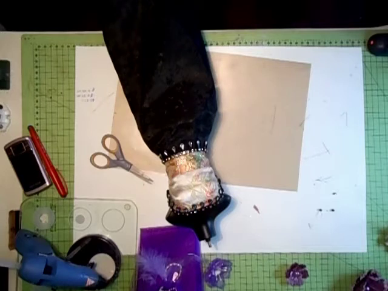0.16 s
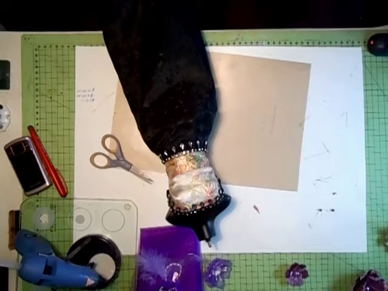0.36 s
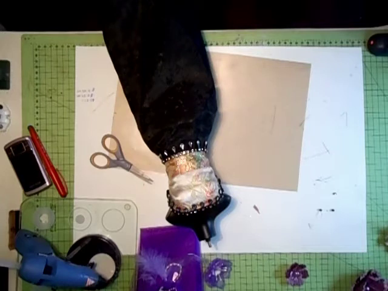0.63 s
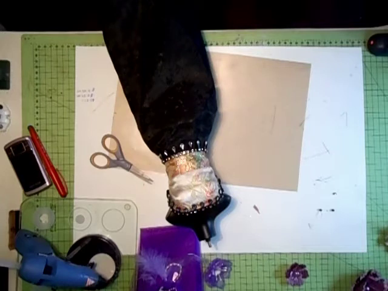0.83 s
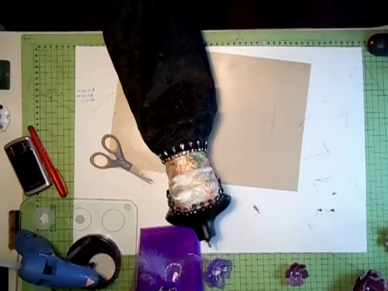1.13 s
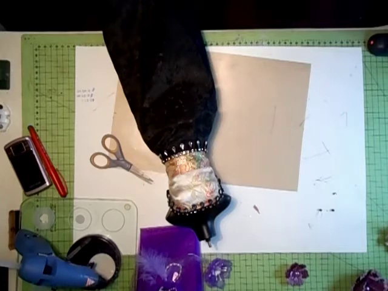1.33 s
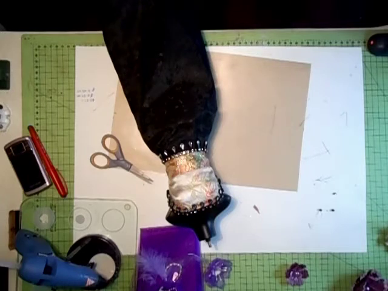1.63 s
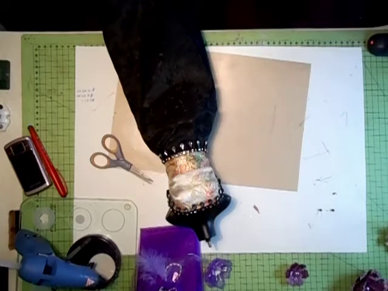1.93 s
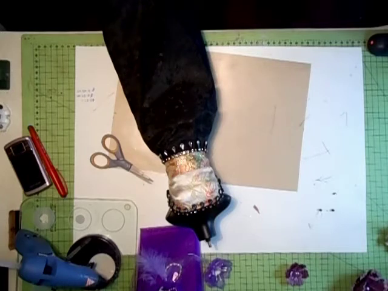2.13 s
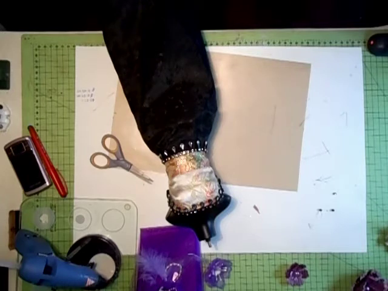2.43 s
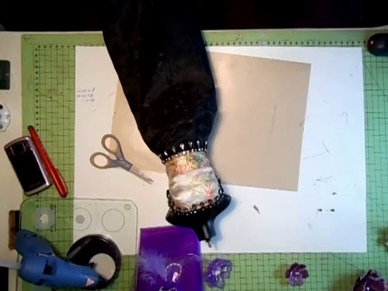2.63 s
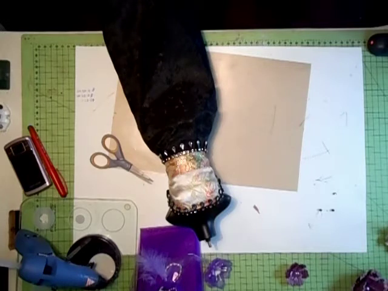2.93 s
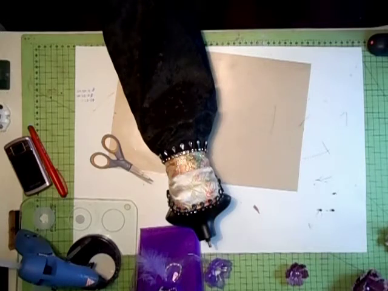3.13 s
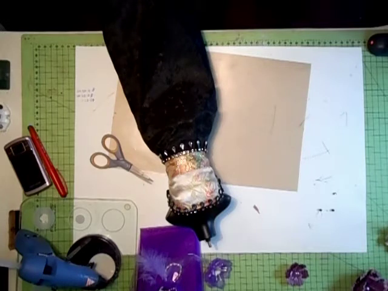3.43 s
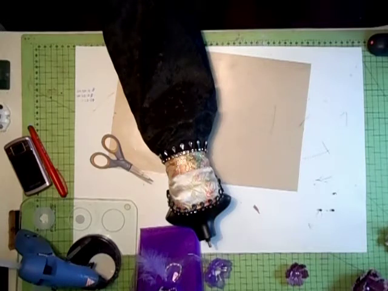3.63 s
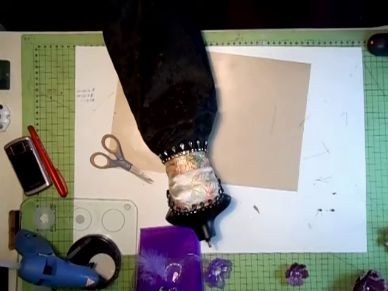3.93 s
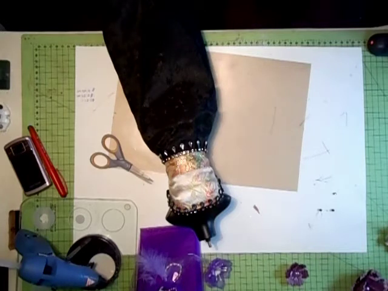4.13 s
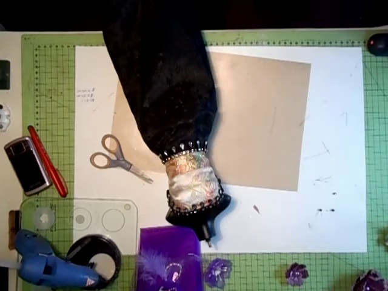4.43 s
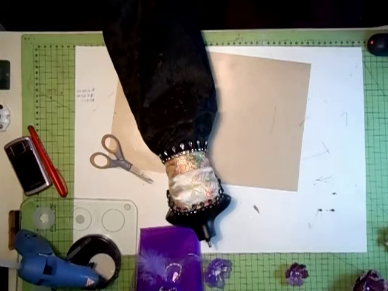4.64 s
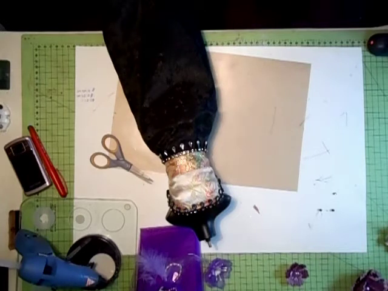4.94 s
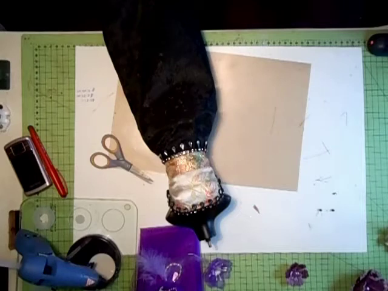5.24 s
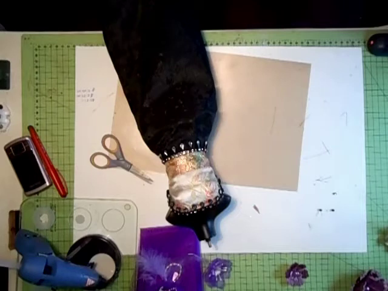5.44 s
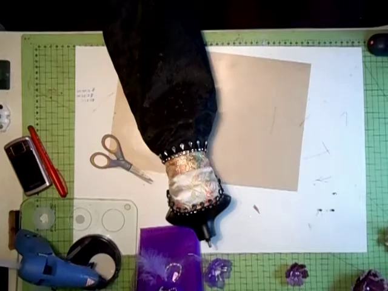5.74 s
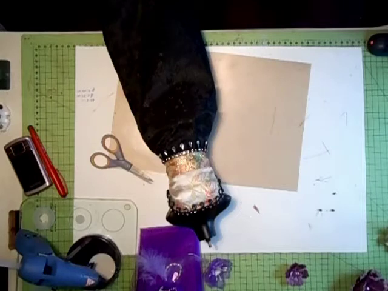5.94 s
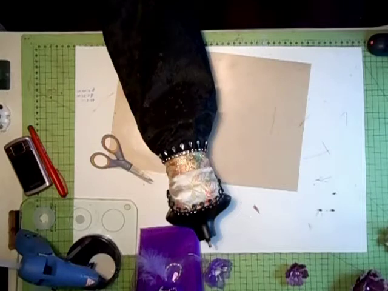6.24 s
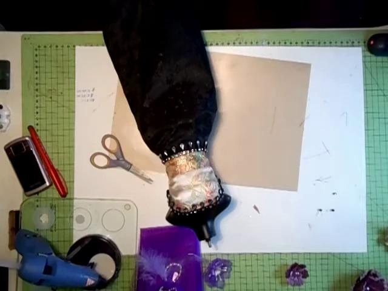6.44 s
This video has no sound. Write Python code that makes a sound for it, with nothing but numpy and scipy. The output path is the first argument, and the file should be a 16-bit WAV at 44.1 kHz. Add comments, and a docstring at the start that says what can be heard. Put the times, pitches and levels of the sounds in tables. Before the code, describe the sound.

A rattle of small hard pieces is already under way, close by, as fingers rummage in a box of buttons and jewellery. Short irregular stirs bring bright ticks, duller clacks and soft box knocks, with faint thin metallic rings. Activity nearly stops just after three seconds, then resumes with knocks and builds to lively rattling at the end. Small furnished room, close stereo microphone, faint steady hiss.

```python
"""Small hard pieces rattle at once; bursts of rattle come and go throughout, with separate ticks, clacks
and soft knocks among them, as fingers search through a box of buttons and jewellery beside a craft table.
Clicks at listed times and random contacts under each stir set ringing tones going: pieces, box and table.
Thin metal chimes and short pitched clinks join in, and the air in the box booms.
Noise tails make the small furnished room; two close microphone ports hear it slightly from the left, over a faint hiss."""
import sys
import numpy as np
from scipy import signal
from scipy.fft import rfft, irfft, next_fast_len
from scipy.io import wavfile

SR = 44100
rng = np.random.default_rng(int(sys.argv[2]) if len(sys.argv) > 2 else 0)


def materialize(psi):
    """Save the field psi as 16-bit PCM at rate SR to the path in sys.argv[1].

    A 1-D psi becomes a single channel; in a 2-D psi each row is a channel.
    """
    bounded = np.clip(np.atleast_2d(psi).T, -1, 1)
    quanta = np.round(bounded * 32767).astype(np.int16)
    wavfile.write(sys.argv[1], SR, quanta)


N = 289726   # length in samples
HOLLOW_HZ, HOLLOW_T60_S = 171, 0.11   # the air in the box


def from_db(db):
    """Gain of a dB value."""
    return 10 ** (np.asarray(db) / 20)


def rms_one(x):
    """Scaled to rms 1, over all rows together."""
    return x / np.sqrt(np.mean(x ** 2) + 1e-20)


def at_hz(points, hz, axis=1):
    """A table column read on a log-frequency axis."""
    points = np.array(points)
    return np.interp(np.log(hz), np.log(points[:, 0]), points[:, axis])


def band(x, low_hz, high_hz):
    """A small body radiates little below its modes, a soft contact excites little above."""
    return signal.sosfilt(signal.butter(2, [low_hz, high_hz], "band", fs=SR, output="sos"), x)


def train(times, db):
    """Clicks of the given dB at the given times."""
    out = np.zeros(N)
    places = np.minimum(np.round(np.asarray(times) * SR).astype(int), N - 1)
    np.add.at(out, places, from_db(db))
    return out


def ring(clicks, hz, t60):
    """A two-pole resonator: a unit click sets a tone of about height 1 ringing."""
    r = from_db(-60 / (t60 * SR))
    w = 2 * np.pi * hz / SR
    tone = signal.lfilter([.5, 0, -.5], [1, -2 * r * np.cos(w), r * r], clicks + 1e-18)
    return tone / np.sin(w / 2 + np.pi / 4)


def modes(clicks, table):
    """A body rings in its own modes, struck at another spot each time."""
    spread_db = 2.5
    out = 0
    for k, (hz, width_hz, db) in enumerate(table):
        struck = clicks * from_db(spread_db * rng.standard_normal(N)) * (-1) ** k
        t60_s = np.log(1000) / np.pi / width_hz
        out = out + from_db(db) * ring(struck, hz, t60_s)
    return out


def pieces(clicks, spectrum, cycles, count, lag_cycles=.2):
    """Pieces of many sizes: each contact jolts them together, the small ones first, in a new mix every time."""
    mix_spread_db = 3.5   # how much the mix changes from contact to contact
    out = 0
    for hz in np.geomspace(spectrum[0][0], spectrum[-1][0], count):
        jolts = clicks * from_db(mix_spread_db * rng.standard_normal(N))
        struck = np.roll(jolts, int(lag_cycles * SR / hz))
        out = out + from_db(at_hz(spectrum, hz)) * ring(struck, hz, cycles / hz)
    return out / np.sqrt(count)


def stereo_bands(size, likeness):
    """Half-octave bands of stereo noise with their centres; left and right share a set part of each."""
    edges = 22 * 2 ** np.arange(0, 9.6, .5)
    white = rng.standard_normal((2, 2, size))
    for k, (low, high) in enumerate(zip(edges, edges[1:])):
        mid, side = band(white[k % 2], low, high)   # neighbouring bands draw on different noise
        centre = np.sqrt(low * high)
        alike = np.clip(at_hz(likeness, centre), -1, 1)
        yield centre, np.sqrt(1 + alike) * mid + np.sqrt(1 - alike) * side * [[1], [-1]]


def stirring():
    """Each stir sets in quickly, swells or sags evenly in dB and stops; rows drive ticks, clacks and knocks."""
    # stirs of the hand in the heap, levels ahead of the rattle drive:
    # start_s, length_s, rattle_db, swell_db over the stir, brightness_db of ticks, box_weight_db of knocks
    stirs = [(-0.02, 0.21, -39.5, -13, -2.5, -1.5), (0.226, 0.21, -48, -1.5, -1.5, -5.5),
             (0.461, 0.056, -51, 4.5, -2, -1.5), (0.632, 0.059, -57, 7.5, -5, -28),
             (0.757, 0.053, -52, 0, -4, 4), (0.891, 0.096, -52, -3, -14, 3),
             (1.024, 0.21, -55, -16, -40, -2), (1.328, 0.084, -54, 5.5, -4, 2.5),
             (1.443, 0.14, -46, -15, -7, -3), (1.942, 0.12, -48.5, -1, -18, 0),
             (2.107, 0.029, -46.5, -7.5, -2.5, -2.5), (2.209, 0.1, -65, -5, -10, 6),
             (2.508, 0.057, -75, 2.5, 0, 11), (2.564, 0.04, -47.5, -15.5, -3, -5),
             (2.651, 0.015, -52, -6.5, -23, -13), (2.738, 0.065, -68.5, 12.5, -1, -3),
             (2.865, 0.13, -56, -2, 1.5, -0.5), (2.974, 0.036, -41.5, -1.5, -7.5, -10.5),
             (3.916, 0.09, -65.5, -4.5, -9, -6), (4.068, 0.12, -67.5, -2, -27, 17),
             (4.269, 0.028, -52, -1, -21, 8), (4.434, 0.092, -63.5, 14, -7, -9),
             (4.564, 0.11, -56, -12, -17, 3), (4.662, 0.094, -54, 0, -9.5, -0.5),
             (4.802, 0.16, -48.5, -3.5, -1.5, 0.5), (4.941, 0.064, -50, -1, -5, -8),
             (5.132, 0.043, -58.5, -1.5, -2, 4.5), (5.174, 0.16, -54, 8.5, -4, -2),
             (5.466, 0.049, -56, 0.5, -16, 1), (5.623, 0.022, -60, -8, -9, -6),
             (5.706, 0.029, -65.5, 9.5, -6, -3), (5.742, 0.12, -50.5, 5.5, -8, -5.5),
             (5.91, 0.19, -44.5, -17, -11, -3.5), (6.104, 0.098, -45.5, -14, -6, -5),
             (6.243, 0.088, -37.5, -9.5, -15, -7), (6.346, 0.07, -47, 1, -6, 0),
             (6.432, 0.12, -58.5, 4.5, -4, -8)]
    attack_s, release_s = 0.0093, 0.028
    t, out = np.arange(N) / SR, np.zeros((3, N))
    for s, length, db, swell_db, bright_db, weight_db in stirs:
        span = slice(max(int(s * SR), 0), int((s + length + release_s) * SR))
        age = t[span] - s
        gate = np.clip(np.minimum(age / attack_s, 1 - (age - length) / release_s), 0, 1)
        row_db = np.array([[bright_db], [0], [weight_db]])
        out[:, span] += gate * from_db(db + swell_db * age / length + row_db)
    return out


def heap():
    """Single collisions and the stirred rattle excite the same bodies: small pieces, box and the air in it."""
    # single collisions, levels ahead of the blow drive: start_s, tick_db, clack_db, box_knock_db
    hits = [(0.004, -36, -25, -33), (0.0963, -26.5, -31, -34), (0.2137, -20.5, -20, -25),
            (0.2307, -38, -38, -39.5), (0.248, -37, -38, -46), (0.2634, -27, -55, -56),
            (0.307, -37, -37, -33), (0.2924, -26, -30, -48), (0.3841, -25.5, -30, -39),
            (0.4862, -44, -47, -34), (0.6298, -31.5, -42, -45), (0.6481, -16.5, -29.5, -28),
            (0.6686, -22.5, -46, -46), (0.7665, -48, -52, -48), (0.782, -33, -29, -41),
            (0.8132, -30, -29, -31), (0.851, -25.5, -25.5, -30.5), (0.866, -48, -29.5, -45),
            (0.931, -37, -36, -51), (0.9483, -35.5, -29.5, -44), (0.978, -27, -32.5, -41),
            (0.9965, -59, -42, -49), (1.3441, -54, -35, -51), (1.358, -42.5, -27, -35),
            (1.414, -29.5, -19.5, -26.5), (1.585, -53, -47, -28), (1.6798, -48.5, -55, -64),
            (1.8298, -44, -55, -50.5), (1.9566, -55, -35.5, -48), (1.9799, -33.5, -27.5, -40),
            (2.0106, -25, -37, -48), (2.016, -47, -30, -44), (2.0404, -30, -33, -43),
            (2.1207, -30.5, -34, -50), (2.3935, -52, -44, -46), (2.3977, -46, -40, -40),
            (2.4101, -43, -37.5, -41), (2.426, -38, -51, -45), (2.4343, -40, -40, -55),
            (2.4707, -32, -30, -34), (2.566, -41, -39.5, -58), (2.67, -54, -45, -43),
            (2.7355, -59, -45, -53), (2.7633, -53, -41, -58), (2.7921, -35, -35.5, -63),
            (2.8355, -36, -35, -45), (2.8788, -64, -32, -31), (2.8917, -59, -26.5, -38.5),
            (2.9337, -34, -45, -42), (2.9371, -28, -27.5, -51), (2.9916, -49, -36, -58),
            (3.5197, -83, -44.5, -37.5), (3.594, -46, -30, -27.5), (3.608, -67, -37, -40),
            (3.6703, -57, -36, -36), (4.0284, -28.5, -25.5, -26), (4.1724, -66, -46, -40),
            (4.2285, -66, -38, -29.5), (4.2685, -25.5, -20.5, -17.5), (4.297, -59, -27, -30.5),
            (4.3902, -40.5, -37, -43), (4.5002, -38, -32.5, -36), (4.5368, -26, -21, -22),
            (4.542, -23.5, -19.5, -50), (4.684, -47, -53, -51), (4.7849, -30.5, -40.5, -40),
            (4.8064, -33.5, -28, -37), (4.8663, -34, -36, -56), (4.9099, -30.5, -50, -42),
            (4.9394, -35, -38, -39), (5.1207, -40.5, -42, -41), (5.1823, -35, -65, -38),
            (5.2387, -38, -43, -34), (5.3125, -40, -36, -33), (5.3399, -51, -30.5, -24),
            (5.3577, -18.5, -24.5, -28.5), (5.4708, -27, -42, -57), (5.5081, -35, -52, -40),
            (5.7651, -65, -31, -27.5), (5.825, -32, -31, -47), (5.857, -25.5, -31, -49),
            (5.883, -30, -33, -37), (5.9317, -47, -52, -50), (5.9713, -39, -39, -60),
            (6.072, -32, -33.5, -63), (6.0917, -20, -33, -30), (6.126, -27, -31, -49),
            (6.224, -39, -27.5, -33), (6.239, -23.5, -29.5, -26.5), (6.2486, -33, -22, -35),
            (6.3667, -34, -31, -43), (6.4535, -30, -53.5, -60), (6.5333, -41.5, -44, -43)]
    # how strongly blows and rattle drive the bodies; rows are ticks, clacks, knocks: drive_db
    blow_db = [
        [10],
        [9],
        [-1.5],
    ]
    rattle_db = [
        [1],
        [-5.5],
        [-17.5],
    ]
    # density of random contacts; rows are ticks, clacks, knocks: contacts_per_s
    rattle_per_s = [
        [140],
        [220],
        [320],
    ]
    # colour of the bright ticks between pieces: pitch_hz, level_db
    tick_colour = [(3000, -16), (5200, -1.5), (6500, -3.5), (8500, -9), (11000, -10), (14200, -30.5)]
    # colour of the duller clacks between pieces: pitch_hz, level_db
    clack_colour = [(1100, -1.5), (1500, -6), (2000, -3), (2600, -3), (3300, -7.5), (4300, -2.5)]
    # resonances of the box: pitch_hz, width_hz, level_db
    box_modes = [(287.5, 55, -24.5), (369, 101, -16.5), (480, 132, -10), (660.5, 116, -3.5), (758, 121, -1),
                 (894, 147, -4), (1206, 196, -3), (1570, 730, -6.5)]
    hollow_db, crack_db = -37.5, -12

    sizes = from_db(3.4 * np.minimum(rng.exponential(1, (3, N)), 4))
    contacts = rng.random((3, N)) < np.divide(rattle_per_s, SR)
    rattle = rms_one(sizes * contacts) * rng.choice([-1, 1], N)
    at, *levels_db = np.transpose(hits)
    blows = from_db(blow_db) * [train(at, db) for db in levels_db]
    ticks, clacks, knocks = blows + rattle * from_db(rattle_db) * stirring()

    # the air in the box is shaken mostly by the stirring, so the blows count less
    shaking = (clacks - 0.46 * blows[1]) * rng.choice([-1, 1], N)
    hollow = from_db(hollow_db) * ring(shaking, HOLLOW_HZ, HOLLOW_T60_S)
    bright = band(pieces(ticks, tick_colour, cycles=7.6, count=20), 4200, 12000)
    dull = band(pieces(clacks, clack_colour, cycles=4.9, count=17), 1305, 8100)
    dull = band(dull, 350, 6500)
    box = band(modes(knocks, box_modes), 230, 5600)
    # the bare contact of a collision, before anything rings
    crack = from_db(crack_db) * band(blows[0], 2530, 15600)
    return bright + dull + box + band(hollow, 69, 188) + crack


def hiss():
    """Steady room air and microphone noise, built from noise bands."""
    # relative noise spectrum: centre_hz, density_db per Hz
    spectrum = [(15, -32), (25, -7), (67, -4), (168, -1), (372, 1), (916, -0.5), (1050, -6), (1260, -0.5),
                (6500, -18), (14000, -27)]
    # how alike left and right are: centre_hz, likeness (0-1)
    likeness = [(30, 0.82), (100, 0.29), (370, 0.34), (2320, 0.19), (14400, 0.03)]
    level_db = -60.5
    noise = sum(from_db(at_hz(spectrum, hz)) * b for hz, b in stereo_bands(N, likeness))
    return from_db(level_db) * rms_one(noise)


def thumps():
    """Heavier things set down softly ring the modes of the table top."""
    # things set down on the table: start_s, level_db of the blow
    set_down = [(0.004, -53), (1.413, -53.5), (1.586, -54), (3.595, -49), (4.029, -48), (4.228, -51),
                (4.269, -41), (6.239, -69)]
    # resonances of the table top: pitch_hz, width_hz, level_db
    table_modes = [(60, 110, -28), (117, 5.7, -16.5), (292, 35, 4.5), (411, 28.4, 0.5)]
    return band(modes(train(*np.transpose(set_down)), table_modes), 34, 590)


def nudges():
    """A soft push on the box sets the air in it ringing, so it booms."""
    # pushes on the box: start_s, level_db of the push
    pushes = [(.01, -45.5), (0.069, -53.5), (4.551, -53.5), (5.25, -54.5), (5.35, -52), (5.95, -58),
              (6.11, -52)]
    return band(ring(train(*np.transpose(pushes)), HOLLOW_HZ, HOLLOW_T60_S), 77, 320)


def chimes():
    """Each metal part rings on a close pair of thin high tones, which beat."""
    # small metal parts: start_s, pitch_hz of the lower tone, level_db of its click
    parts = [(0.089, 10150, -46), (0.124, 10200, -44), (.215, 13700, -52), (.27, 13700, -52),
             (.385, 13800, -56), (0.492, 13100, -51), (.65, 13760, -40), (.675, 13900, -43),
             (2.126, 10180, -51), (2.885, 12000, -58), (2.937, 12030, -40.5), (3.017, 12240, -38.5),
             (2.937, 12950, -54), (3.02, 12800, -52)]
    t60_s = 0.045
    out = 0
    for s, hz, db in parts:
        out = out + ring(train([s], [db]), hz, t60_s)
        out = out + ring(train([s], [db - 4]), hz * 1.0027, t60_s)
    return out


def clinks():
    """Beads and buttons with a clear short pitch each ring one tone that dies by 60 dB in 18 cycles."""
    # pitched beads and buttons: start_s, pitch_hz, level_db of the click
    beads = [(.63, 5000, -34), (1.4142, 2010, -29), (1.42, 2070, -28), (1.83, 5270, -47),
             (2.4115, 2150, -33), (4.2685, 5060, -36), (6.092, 736, -28.5), (6.224, 756, -32)]
    return sum(ring(train([s], [db]), hz, 18 / hz) for s, hz, db in beads)


def room(x):
    """One wall echo and dense reflections dying band by band; they change as the hand moves between three spots."""
    # decay of the reflections: centre_hz, t60_s, level_db at the start
    decay = [(164.4, 0.21, -31.5), (413, 0.26, -27), (905, 0.2, -31), (2652, 0.26, -26), (7150, 0.21, -32),
             (10250, 0.31, -36), (13200, 0.19, -24.5)]
    # how alike left and right reflections are: centre_hz, likeness (0-1)
    likeness = [(60, 1), (700, 0.98), (1500, 0.97), (3000, 0.9), (6500, 0.75), (14000, 0.2)]
    direct_db, echo_s, echo_db = -3, .019, -16   # the echo is a distinct return from the nearest wall
    onset_s = 0.0008   # reflections build up over this time
    near_db, near_s = 0, .003   # table and box returns crowd the first milliseconds

    t = np.arange(SR // 2) / SR
    out = from_db(direct_db) * x + from_db(echo_db) * np.roll(x, int(echo_s * SR))
    shape = np.minimum(t / onset_s, 1) * (1 + from_db(near_db) * np.exp(-t / near_s))
    for spot in range(3):
        tail = 0
        for hz, noise in stereo_bands(len(t), likeness):
            tail = tail + noise * from_db(at_hz(decay, hz, axis=2) - 60 * t / at_hz(decay, hz))
        # steady cosine weights whose squares add to 1 over the three spots
        here = np.sqrt(2 / 3) * np.cos(np.pi * (2.3 * np.arange(N) / SR + spot / 3))
        out = out + signal.fftconvolve((here * x)[None], tail * shape, axes=1)[:, :N]
    return out


def ports(x):
    """The left port is reached first and is a little brighter; each side takes half the difference."""
    # level difference of the two ports: centre_hz, left_minus_right_db
    balance = [(60, 1), (240, 0.5), (930, -1), (3660, -0.5), (14400, 2.5)]
    lag_s = 3.1e-5
    size = next_fast_len(N + 64)
    hz = np.arange(size // 2 + 1) * SR / size + 0.0011   # kept off zero for the logarithm
    lead = from_db(at_hz(balance, hz) / 2) * np.exp(1j * np.pi * hz * lag_s)
    return irfft(rfft(x, size) * [lead, 1 / lead], size)[:, :N]


def scene():
    """Heap, thumps, nudges, chimes and clinks in the room, over the hiss."""
    sources = heap() + thumps() + nudges() + chimes() + clinks()
    return ports(room(sources)) + hiss()


def record(dry):
    """A steep low-pass cuts the top, 60 dB down from 15400 Hz."""
    return signal.sosfilt(signal.cheby2(10, 60, 15400, fs=SR, output="sos"), dry)


dry = scene()
out = record(dry)
materialize(out)
```